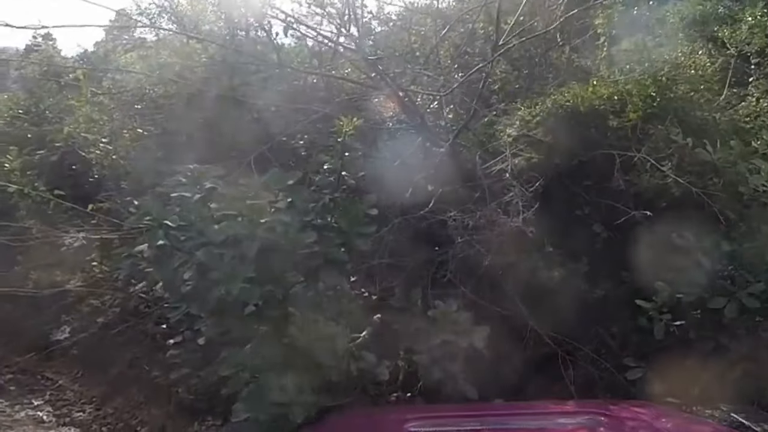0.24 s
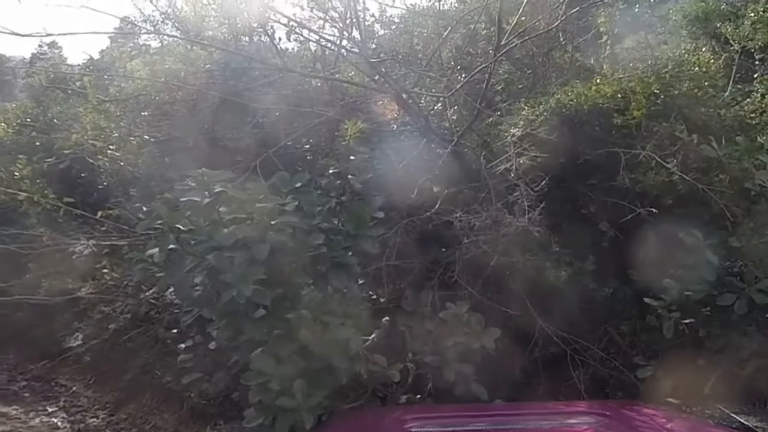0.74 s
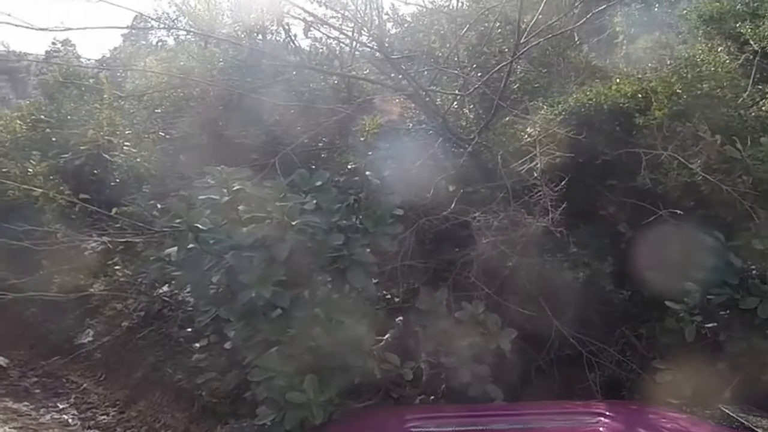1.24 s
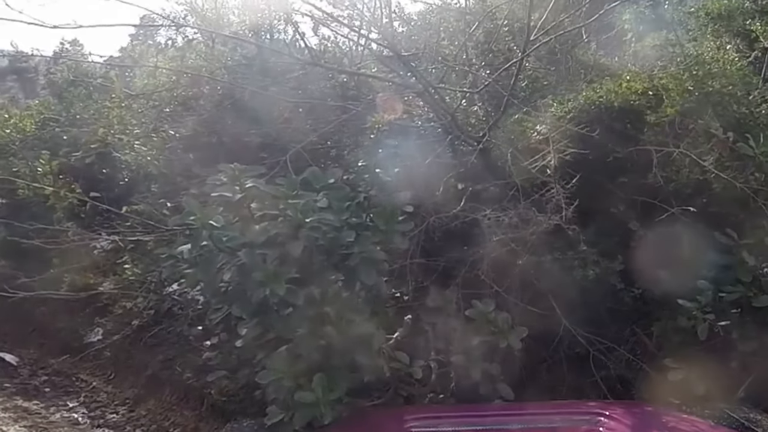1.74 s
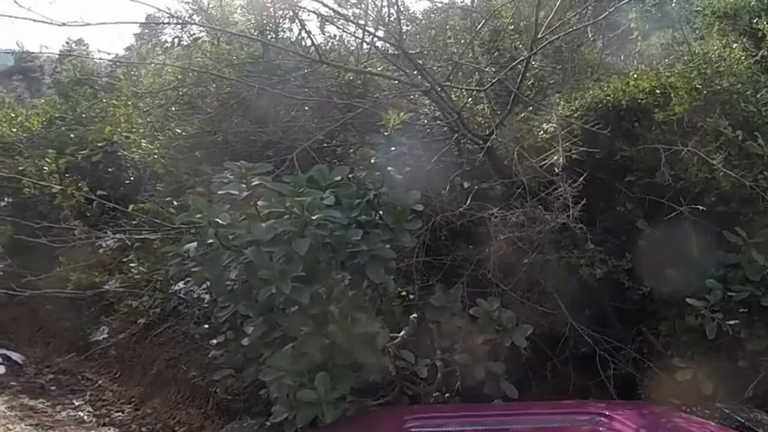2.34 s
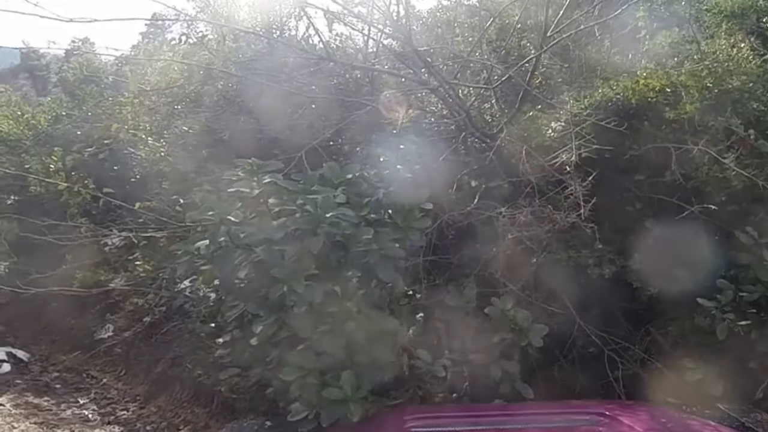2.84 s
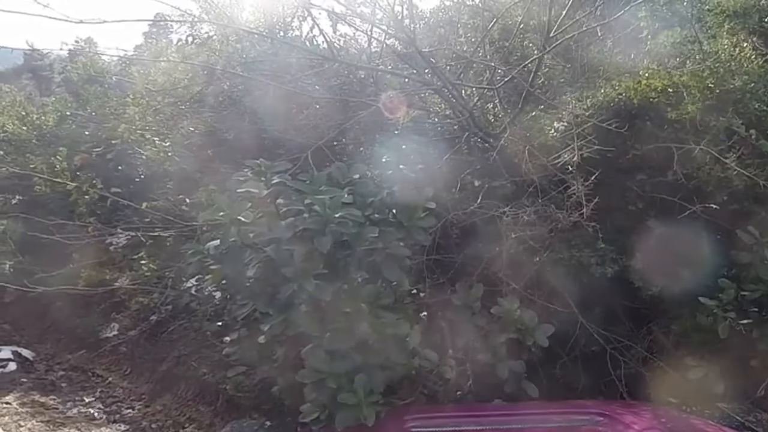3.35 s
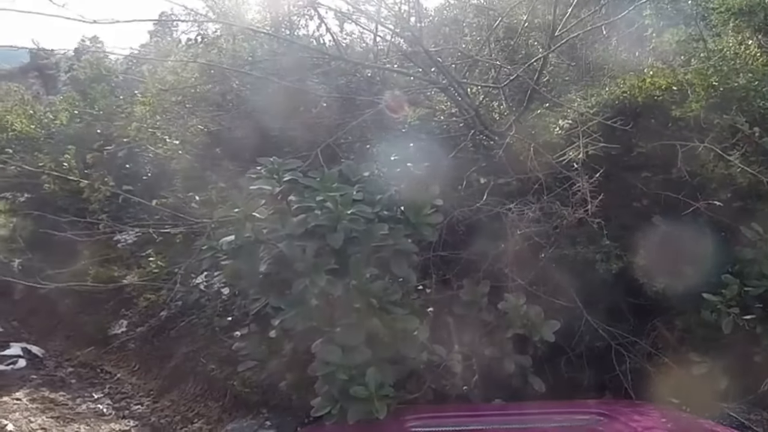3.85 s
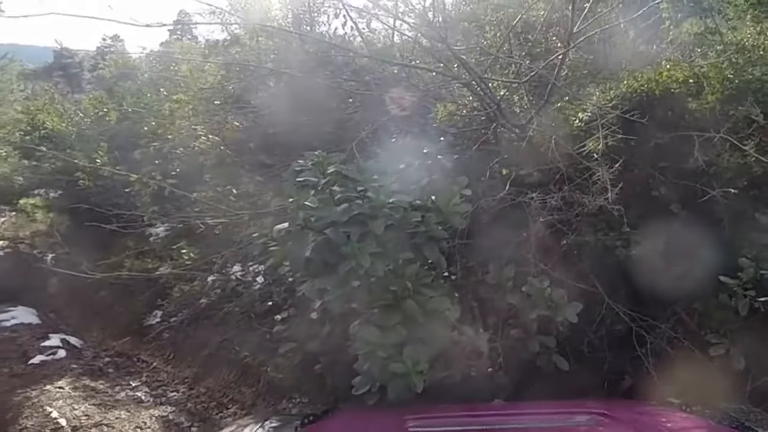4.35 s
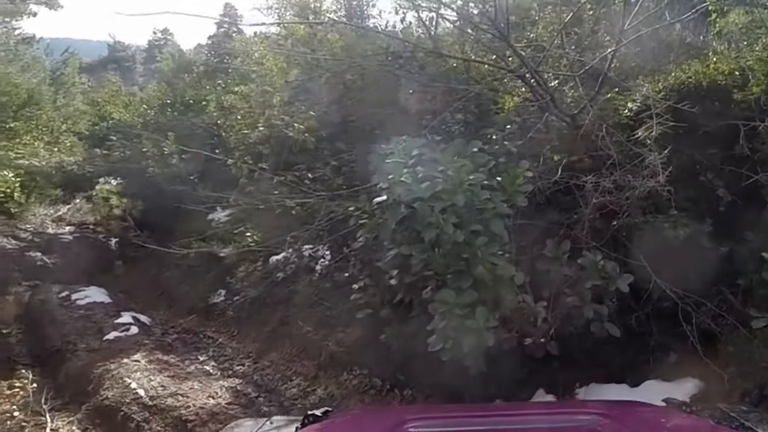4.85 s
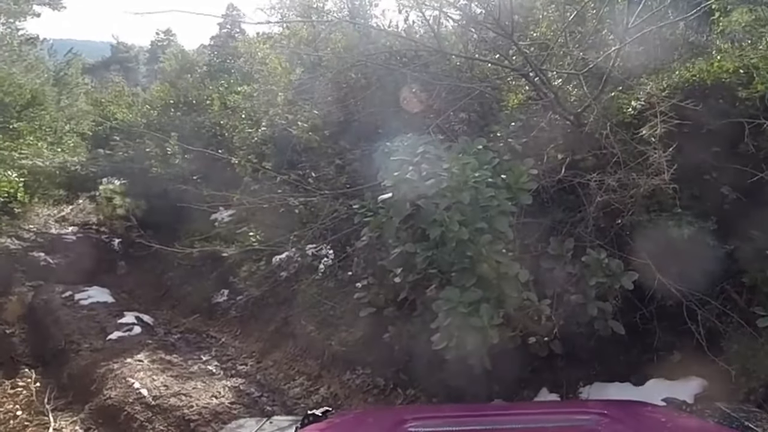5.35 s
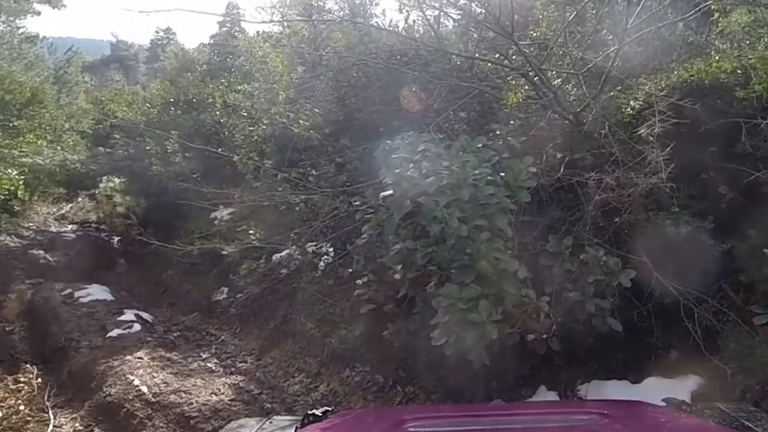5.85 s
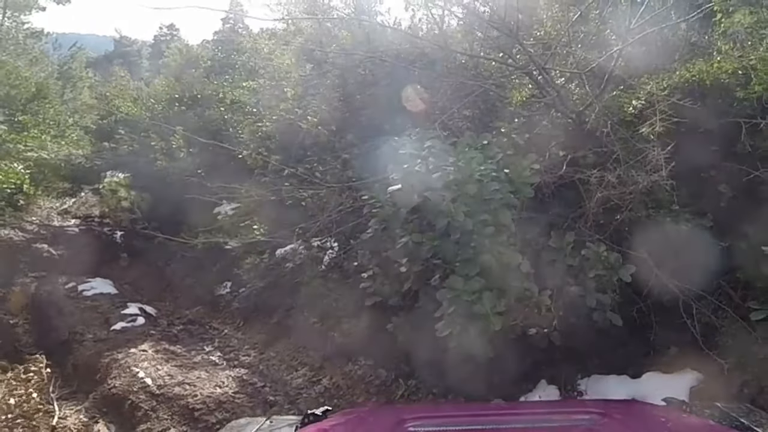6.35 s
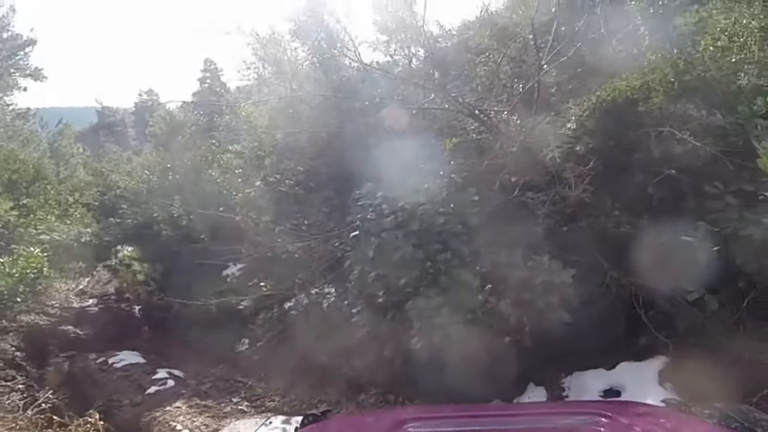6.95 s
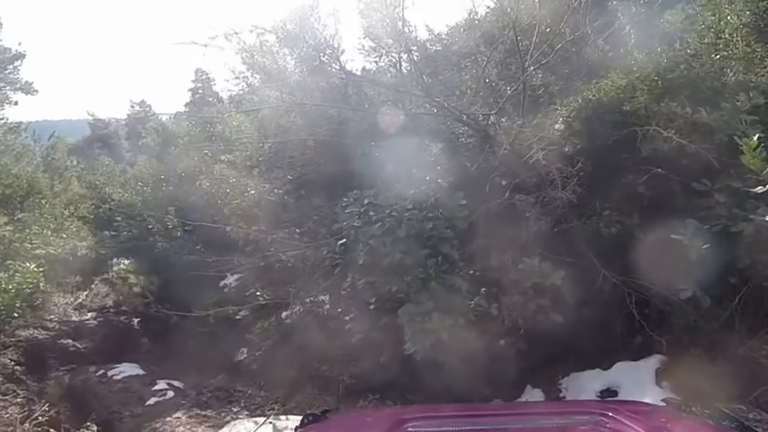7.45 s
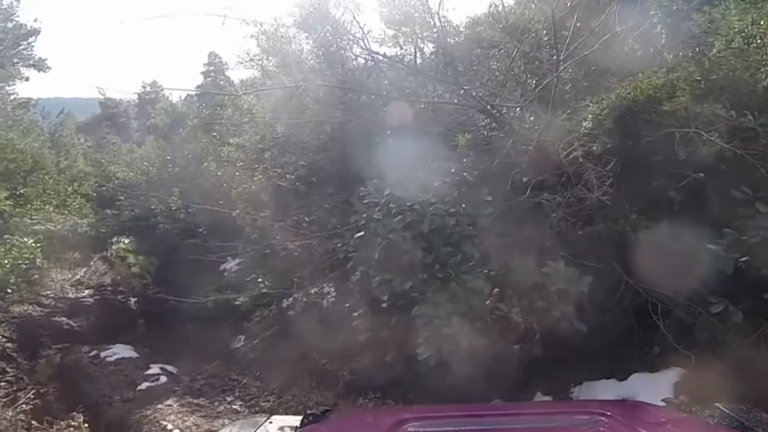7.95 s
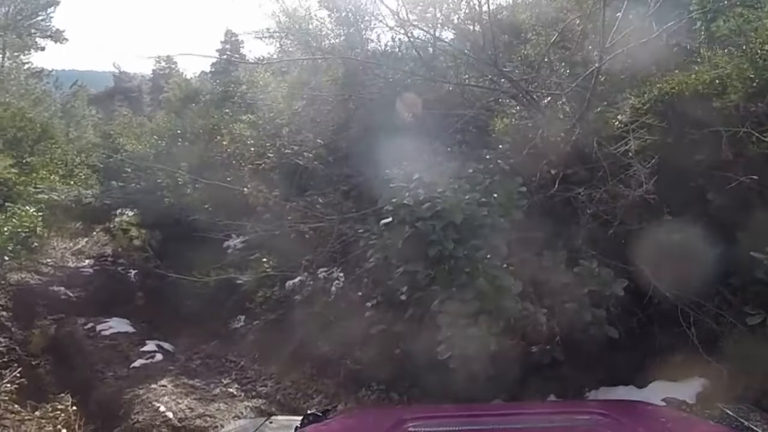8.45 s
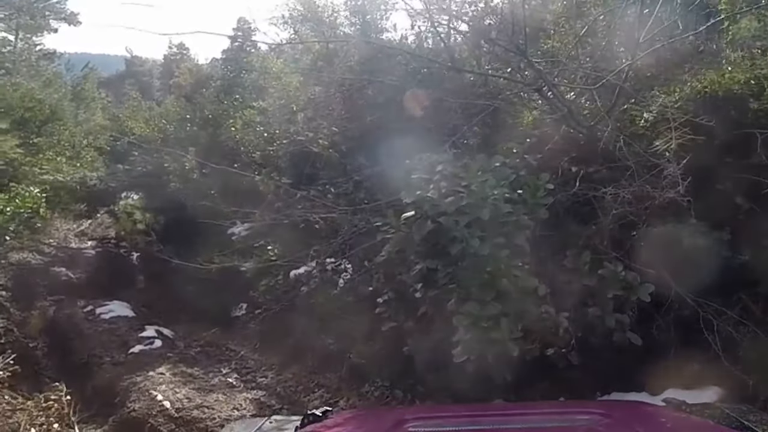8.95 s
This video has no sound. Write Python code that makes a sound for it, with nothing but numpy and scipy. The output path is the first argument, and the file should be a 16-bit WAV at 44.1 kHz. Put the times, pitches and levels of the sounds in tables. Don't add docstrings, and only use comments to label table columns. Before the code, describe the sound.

A boomy, muffled recording position on a four-wheel-drive's body, in a sealed case that dulls the highs. At 0-0.4 s it lurches: a heavy low thump, panel knocks, clip ticks and dry twig snaps. From 0.5 to 2.7 s it is calmer, with a low engine hum, a steering-pump groan around 0.5-1 s and fainter ones near 1.7 and 2.5 s, a deep thump at 1 s and small rattles near 2.1 s. At 2.8 s the engine begins a long rising surge; hard drops hit at 3.2 and 3.4 s, with leaf swishes and a thin gear rasp. It peaks around 4.3 s and eases by 4.9 s. Bumps continue, then a stronger surge starts at 5.9 s, with growling trim and a brief tyre howl near 6.6 s, and sharp knocks at 6.9-7.1 s. From 7.5 s it slows, with softer thumps and a cluster of ticks around 8.4 s, fading to low rumble by 9.2 s.

```python
import sys
import numpy as np
from scipy import signal
from scipy.io import wavfile
from scipy.ndimage import uniform_filter1d

SR = 44100
rng = np.random.default_rng(int(sys.argv[2]) if len(sys.argv) > 2 else 0)


def field_ratio(decibels):
    return 10 ** (np.asarray(decibels, dtype=float) / 20)


def put_to_file(sound):
    columns = np.atleast_2d(sound).T
    safe = np.clip(columns, -1, 1)
    whole_steps = np.round(safe * 32767)
    wavfile.write(sys.argv[1], SR, whole_steps.astype(np.int16))


N = 405719


def evened(x):
    return x / np.sqrt(np.mean(x ** 2) + 1e-20)


def laid(events):
    mix = np.zeros(N)
    for start_s, sound in events:
        part = mix[round(start_s * SR):][:len(sound)]
        part += sound[:len(part)]
    return mix


def columns(rows):
    s, *values = np.transpose(rows)
    t = np.arange(s[0], s[-1], 1 / SR)
    return s[0], [np.interp(t, s, v) for v in values]


def wander(length, hz):
    pole = np.exp(-hz / SR * 6)
    return evened(signal.lfilter([1], [1, -2 * pole, pole ** 2], rng.standard_normal(length)))


def ring_gain(rings, hz):
    return 1 + sum(field_ratio(db) / (1 + (2 * (hz - centre) / width) ** 2) for centre, width, db in rings)


def shaking(colour, size, patchy_db, flicker_db, rings=()):
    hop = size // 4
    hz = np.fft.rfftfreq(size, 1 / SR)
    real, imag, patches = rng.standard_normal((N // hop + 5, len(hz), 3)).T
    patches = uniform_filter1d(patches, size=5, axis=0)
    patches = evened(uniform_filter1d(patches, size=7, axis=1))
    jolts = np.minimum(rng.exponential(1, real.shape[1]), 2.5) - 1
    colour_hz, colour_db = np.transpose(colour)
    gain = field_ratio(np.interp(np.log(hz + 1), np.log(colour_hz), colour_db, -90, -90))
    gain *= ring_gain(rings, hz)
    bins = (real + 1j * imag) * gain[:, None] * field_ratio(patchy_db * patches + flicker_db * jolts)
    return evened(signal.istft(bins, nperseg=size, noverlap=size - hop)[1][:N])


def lifts(rows):
    t = np.arange(0, N / SR + .01, .002)
    humps = sum(np.interp(t, [s - abs(rise), s, s + abs(fall)], [0, db, 0]) for s, db, rise, fall in rows)
    return np.interp(np.arange(N) / SR, t, humps)


# (time [s], roughness [dB])
ROUGHNESS = [(0.04, 4), (.22, 3.5), (.4, 3.5), (.68, -6), (1.9, -5.5), (2.08, -4), (2.26, -3.5),
             (3.66, -0.5), (3.99, 4), (4.27, 0), (4.53, 3.5), (4.84, 1.5), (5.3, 6), (5.75, -0.5),
             (6.0, 5.5), (6.8, 5), (7.44, 0.1), (9.2, -6.5)]
# (time [s], load [dB])
WHEEL_LOAD = [(0, -3), (.7, -4), (2.3, -6), (2.69, -6), (2.87, 1.4), (3.2, 4.5), (3.99, 4), (4.299, 6),
              (5.24, 3.5), (5.75, -0.3), (5.93, 3.5), (6.06, 5.5), (6.62, 7.5), (7.1, 4.5), (7.5, 1.5),
              (8.28, -1.5), (9.2, -6)]


def follow(db, rough_share, load_share):
    t = np.arange(N) / SR
    ground = np.interp(t, *np.transpose(ROUGHNESS))
    load = np.interp(t, *np.transpose(WHEEL_LOAD))
    return db + rough_share * ground + load_share * load


def drift(start, length, first_hz, last_hz, db):
    attack_s, start_db = 0.11, -8
    attack_end_hz = first_hz + attack_s / length * (last_hz - first_hz)
    return [(start, first_hz, db + start_db), (start + attack_s, attack_end_hz, db), (start + length, last_hz, db)]


def surge(rows, orders, rough):
    start_s, (hz, db) = columns(rows)
    size = len(hz)
    turns = np.cumsum(hz * (1 + rough * wander(size, 15.0))) / SR
    tones = sum(field_ratio(d + 0.63 * wander(size, 39.0)) * np.sin(2 * np.pi * k * turns) for k, d in orders)
    level = np.sqrt(2) * field_ratio(db + 1.3 * wander(size, 60.0))
    return start_s, level * tones * signal.windows.tukey(size, .12)


def groan(rows, partials, rough):
    start_s, (hz, low_db, high_db) = columns(rows)
    size = len(hz)
    turns = np.cumsum(hz * (1 + rough * wander(size, 27.0))) / SR
    upper = sum(field_ratio(d + 2.6 * wander(size, 17.0)) * np.sin(2 * np.pi * k * turns + k * k) for k, d in partials)
    stack = field_ratio(low_db) * np.sin(2 * np.pi * turns) + field_ratio(high_db) * upper
    return start_s, np.sqrt(2) * stack * signal.windows.tukey(size, .45)


def ring(hz, t60, rise):
    t = np.arange(round(SR * (t60 + 3 * rise))) / SR
    shape = (1 - np.exp(-t / rise)) ** 2 * field_ratio(-60 * t / t60)
    return shape / shape.max() * np.sin(2 * np.pi * hz * t)


# (time [s], firing rate [Hz], level [dB])
THROTTLE_PUSHES = [
    [(2.75, 51.7, -31), (2.8, 56.85, -15.5), (2.99, 70.5, -22.5), (3.22, 83.87, -18.5), (3.9, 86, -25),
     (4.0, 94.75, -12.5), (4.27, 102.7, -10), (4.68, 105.1, -14.5), (4.88, 105.7, -24)],
    [(5.85, 58.45, -23), (6.014, 80.5, -10.5), (6.128, 97.3, -7), (6.202, 106.1, -10.5), (6.55, 95.95, -15),
     (6.804, 87.3, -25), (6.906, 87.7, -19.5), (7.124, 84, -20.5), (7.2, 82.6, -9)],
]
# (start [s], length [s], first [Hz], last [Hz], level [dB])
ENGINE_DRIFTS = [
    (0.401, 0.6, 53.85, 58.5, -23.5),
    (1.251, 0.89, 101, 82.14, -25.5),
    (7.548, .7, 72.4, 54.5, -30),
    (8.551, 0.66, 104, 86, -26.5),
]
# (multiple of firing rate [-], level [dB])
FIRING_ORDERS = [(.5, -22.5), (1, 1), (1.5, -23.5), (2, -28.5), (3, -36.5)]


def engine():
    rates = THROTTLE_PUSHES + [drift(*row) for row in ENGINE_DRIFTS]
    return laid(surge(rows, FIRING_ORDERS, rough=.006) for rows in rates)


# (start [s], length [s], first [Hz], last [Hz], level [dB], lowest [Hz], highest [Hz])
FIRING_GROWLS = [
    (4.22, 0.53, 102.1, 105, -46, 450, 1090),
    (6.36, 0.43, 101.7, 88, -44, 520, 1150),
    (6.5, .3, 96, 88, -54, 1200, 3000),
]


def growl(start, length, first_hz, last_hz, db, low_hz, high_hz):
    size = round(length * SR)
    turns = np.cumsum(np.linspace(first_hz, last_hz, size) * (1 + .03 * wander(size, 30.0))) / SR
    pulses = 0.44 + np.exp(-(turns % 1) / 0.4)
    bursts = pulses * field_ratio(2.5 * wander(size, 60.0)) * rng.standard_normal(size)
    band = signal.butter(3, [low_hz, high_hz], "band", fs=SR, output="sos")
    return start, field_ratio(db) * evened(signal.sosfilt(band, bursts)) * signal.windows.tukey(size, .7)


def growls():
    return laid(growl(*row) for row in FIRING_GROWLS)


# (start [s], length [s], first [Hz], last [Hz], level [dB])
SHAFT_HUMS = [(3.701, .32, 125, 130, -30.5), (3.999, .5, 69.8, 69.7, -26.5),
              (4.3, 0.444, 152.2, 154, -31.5), (4.4, 0.27, 180, 191, -38), (5.501, .3, 70, 71.7, -32),
              (5.75, .38, 122, 138, -23.5), (5.85, .5, 197, 203, -33.5), (6.35, 0.503, 131, 126, -26),
              (7.049, 0.49, 74, 66, -27), (7.503, 0.19, 360, 335, -41.5), (8.05, 0.24, 290, 297, -43),
              (0.82, 0.29, 263, 285, -48), (6.3, 0.16, 370, 390, -44), (7, 0.195, 580, 628, -49.5),
              (6.54, 0.275, 915, 918, -42.5), (6.6, .22, 600, 615, -48.5), (6.6, 0.13, 1400, 980, -53),
              (4.1, 0.18, 275, 340, -42.5), (3.9, .25, 288, 284, -39.5), (5.4, 0.347, 325, 330, -40.5),
              (6.42, .25, 305, 312, -37), (2.3, 0.089, 580, 670, -50), (2.17, 0.068, 410, 620, -48),
              (6.9, 0.074, 510, 505, -46), (.75, 0.2, 86, 92, -32), (3.8, 0.11, 90, 96, -24),
              (2.3, .12, 58.3, 61, -23), (7.5, .45, 97, 100, -28), (8.06, .33, 102, 106, -29.5),
              (1.2, 0.3, 57, 54, -29), (.2, .2, 100, 104, -27.5), (4.1, 0.27, 288, 292, -41),
              (8.2, .16, 69, 63, -32), (8.7, .25, 262, 245, -48.5), (8.75, .3, 335, 345, -48),
              (7.2, 0.255, 88, 92, -26.5)]


def shafts():
    return laid(surge(drift(*row), [(1, 0)], rough=.008) for row in SHAFT_HUMS)


# (peak time [s], lift [dB], rise [s], fall [s])
BODY_HEAVES = [
    (0.0, 20.5, 0.11, 0.29),
    (.67, -6, .12, 0.18),
    (2.79, 10, 0.59, 1.6),
    (3.46, 6.5, 0.14, 0.051),
    (3.64, 1, 0.098, 0.16),
    (4.59, 18, 0.38, 0.94),
    (5.56, 10.5, 0.099, 0.24),
    (7.0, 17.5, 0.78, 0.24),
    (8.89, 4, .5, .1),
]


def boom():
    mode_hz = 33.63
    db = follow(-31.5, rough_share=0.21, load_share=0.099) + lifts(BODY_HEAVES)
    turns = np.cumsum(mode_hz * (1 + 0.055 * wander(N, 5.6))) / SR
    return np.sqrt(2) * field_ratio(db + 1.3 * wander(N, 20.0)) * -np.cos(2 * np.pi * turns)


# (frequency [Hz], density [dB per Hz])
PAN_COLOUR = [(18, -22), (28, -16), (46, -11), (60, -2), (100, 1.5), (116, -6.5), (135, -17.5), (160, -29),
              (220, -51)]
# (frequency [Hz], width [Hz], level [dB])
FLOOR_MODES = [(56.5, 7.3, 13.5), (72.2, 3.6, 8), (86, 2.4, 9.5), (104, 8.5, 9.5), (123, 20, 6)]
# (peak time [s], lift [dB], rise [s], fall [s])
WHEEL_RUTS = [(1.7, -6.5, 0.48, 0.034), (2.26, -5, 0.23, 0.051), (2.87, 7.5, 0.28, 0.32),
              (3.28, -7, .07, 0.088), (4.5, -4.5, .45, .3), (6.3, -3, .25, 0.32), (7.35, -3, .15, .3),
              (1.4, -3, .2, .2), (5.24, 3, 0.7, 0.04), (5.75, -8, 0.098, 0.12), (5.93, 3, 0.051, 0.11),
              (8.37, -10, 0.18, 0.078), (9.07, -9, 0.57, 0.12)]


def floor_pan():
    noise = shaking(PAN_COLOUR, size=8192, patchy_db=-0.05, flicker_db=0.9, rings=FLOOR_MODES)
    return noise * field_ratio(5.0 + follow(-28, rough_share=0.4, load_share=0.23) + lifts(WHEEL_RUTS))


# (frequency [Hz], density [dB per Hz])
DOOR_COLOUR = [(76, -29.5), (130, 0), (135, -2.5), (167, -6.5), (236, -10), (258, -12), (291, -6),
               (306, -5.5), (393, -18), (450, -30.5), (580, -55.5), (990, -120)]
# (frequency [Hz], width [Hz], level [dB])
DOOR_RINGS = [(156.3, 11, 2.5), (200, 10, 2.5), (282.55, 4.1, 7), (307.9, 7.4, 5.5), (345, 12, 4.5)]
# (peak time [s], lift [dB], rise [s], fall [s])
DOOR_SWAYS = [(.22, -3, .1, 0.16), (.85, -2, .3, .2), (1.6, -2, 0.32, 0.36), (2.6, -3, 0.12, 0.16),
              (3.97, -4.5, 0.11, .15), (5.65, -3, 0.13, .15), (5.25, -4.5, .15, 0.16),
              (5.95, 4, 0.19, 0.23), (7.42, -4, 0.23, 0.19), (8.62, -6, 0.12, 0.11), (1.3, -3, .1, .1),
              (2.2, -4, .06, .06), (8.8, 2, 0.089, 0.11), (9.05, -6, 0.15, .15)]


def doors(shudder):
    noise = shaking(DOOR_COLOUR, size=4096, patchy_db=3.8, flicker_db=1.6, rings=DOOR_RINGS)
    return noise * field_ratio(0.73 * shudder + follow(-36, rough_share=0.96, load_share=0) + lifts(DOOR_SWAYS))


# (frequency [Hz], density [dB per Hz])
TRIM_COLOUR = [(250, -30), (430, -1), (542, -4), (602, -1), (701, -2.5), (833, -9.5), (898, -1.5),
               (981, -3), (1030, -4), (1130, -12.5), (1230, -8.5), (1270, -17.5), (1400, -24),
               (1820, -49.5), (3080, -120)]
# (frequency [Hz], width [Hz], level [dB])
TRIM_RINGS = [(505, 18, 1.5), (615, 21, 2.5), (729, 29, 1.5), (917, 22, 2), (1001.4, 16, 3.5),
              (1200, 15, -0.5)]
# (peak time [s], lift [dB], rise [s], fall [s])
FRAME_TWISTS = [
    (0.04, 1.5, 0.14, .15),
    (.4, 1, .15, 0.099),
    (4.53, 7, 0.68, 0.63),
    (6.74, 10, 0.59, 0.093),
    (7.0, 3, 0.14, 0.54),
    (8.36, 2, 0.071, 0.54),
    (9.2, 2.5, 0.22, .1),
]


def trim(shudder):
    noise = shaking(TRIM_COLOUR, size=2048, patchy_db=2.0, flicker_db=1.05, rings=TRIM_RINGS)
    return noise * field_ratio(1.4 * shudder + follow(-49.5, rough_share=0.63, load_share=0.075) + lifts(FRAME_TWISTS))


# (frequency [Hz], density [dB per Hz])
HISS_COLOUR = [(790, -35.5), (1350, -7), (1640, -6.5), (1830, -7), (2250, -4), (3250, -13), (3870, -12.5),
               (4500, -15.5), (6060, -15), (7280, -20.5), (10100, -25), (13200, -32), (15500, -50)]
# (frequency [Hz], width [Hz], level [dB])
CASE_RINGS = [(1623, 270, 0.5), (2784, 260, 1.5), (3864, 100, 1), (4050, 22, 1.5), (5280, 300, -0.5),
              (5960, 270, 0.5), (6780, 230, 1), (7840, 150, 3), (10030, 260, 1.5)]


def hiss(shudder):
    noise = shaking(HISS_COLOUR, size=1024, patchy_db=1.35, flicker_db=0.0, rings=CASE_RINGS)
    return noise * field_ratio(2.5 + 0.44 * shudder + follow(-59.5, rough_share=0, load_share=0.85))


def body():
    shudder = wander(N, 150.0)
    return floor_pan() + doors(shudder) + trim(shudder) + hiss(shudder)


# (time [s], peak [dB], pitch [Hz])
BODY_THUMPS = [
    (0.009, -10.5, 100.4),
    (0.072, -4.5, 91.4),
    (1.015, -5, 68.4),
    (1.11, -10, 66.6),
    (2.03, -10, 76),
    (3.167, -4.5, 81.9),
    (3.421, -4, 90.6),
    (7.625, -13.5, 84.4),
    (8.021, -9.5, 104),
    (8.449, -7.5, 64.5),
]


def thumps():
    return laid((s, field_ratio(db - 2.0) * ring(hz, t60=0.24, rise=0.0069)) for s, db, hz in BODY_THUMPS)


# (time [s], peak [dB],
# pitch [Hz], t60 [s])
PANEL_KNOCKS = [(0.097, -34, 295, 0.048), (0.0099, -22, 150, 0.12), (.12, -24, 144, .15),
                (1.681, -32.5, 200, 0.12), (2.102, -28.5, 337, 0.094), (2.28, -33, 347, 0.24),
                (2.451, -28, 327, 0.093), (3.172, -25, 330, 0.095), (4.93, -21.5, 310, 0.058),
                (6.731, -22, 308, 0.11), (6.918, -15.5, 300, 0.1), (7.061, -22.5, 308, 0.098),
                (8.021, -22.5, 304.2, 0.066), (0.361, -30, 170, 0.59), (3.45, -26, 172, 0.34),
                (4.5, -25, 300, 0.39), (4.61, -25, 308, 0.49), (5.971, -17, 147, 0.28),
                (6.801, -24.5, 297, 0.1), (7.09, -24.5, 345, 0.092), (7.27, -31, 333, .08),
                (7.32, -32, 204, 0.22), (7.12, -24.5, 178, 0.12), (7.72, -30.5, 178, 0.21),
                (8.44, -33, 207, .1), (2.3, -32, 176, .2), (5.42, -30, 327, 0.24),
                (5.099, -25.5, 133.7, 0.48), (8.02, -27.5, 209, 0.14), (3.82, -37.5, 490, 0.19),
                (7.71, -41.5, 500, 0.19), (2.11, -40, 470, .12), (7.46, -32.5, 187, 0.18),
                (5.47, -24, 135, 0.16), (5.86, -28.5, 195, .15), (6.47, -29, 303, .1),
                (7.57, -19, 95.3, 0.31)]


def knocks():
    return laid((s, field_ratio(db) * ring(hz, t60, rise=0.046 * t60)) for s, db, hz, t60 in PANEL_KNOCKS)


# (start [s], length [s], mid-climb time [s], level [dB], strain [dB])
STEERING_GROANS = [
    (.5, 0.47, 0.61, -28, 15.5),
    (1.66, 0.25, 1, -32, 13),
    (2.44, 0.523, 2.67, -29, 3),
]
# (multiple [-], level [dB])
PUMP_PARTIALS = [(2, 8.5), (3, 5.5), (4, 2), (5, -9), (6, -14.5), (8, -18), (11, -20.5)]


def pump(start, length, middle, db, strain_db):
    idle_hz, full_hz, climb_s = 160.3, 194.7, 0.0612
    s = np.linspace(start, start + length, num=20)
    climb = 1 / (1 + np.exp((middle - s) / climb_s))
    hz = idle_hz + (full_hz - idle_hz) * climb
    low_db = db - strain_db * climb ** 2.9
    high_db = db - 33 + 0.53 * strain_db * climb
    return np.transpose([s, hz, low_db, high_db])


def steering():
    return laid(groan(pump(*row), PUMP_PARTIALS, rough=0.0025) for row in STEERING_GROANS)


# (time [s], tread rate [Hz], lowest partial [dB], upper partials [dB])
TYRE_SPINS = [
    [(6.28, 298, -51.5, -53), (6.42, 322, -56, -45.5), (6.52, 345, -56, -43), (6.6, 378, -53, -36)],
    [(6.54, 186.8, -42, -39), (6.62, 198.9, -44, -45.5), (6.7, 204.7, -26, -41), (6.78, 197, -48, -52)],
]
# (multiple [-], level [dB])
TREAD_PARTIALS = [
    [(2, -2), (3, -6), (4, -23)],
    [(3, -6.5), (4, -10), (5, 4.5), (6, -16), (7, -21)],
]


def tyres():
    return laid(groan(rows, partials, rough=.012) for rows, partials in zip(TYRE_SPINS, TREAD_PARTIALS))


# (time [s], peak [dB], pitch [Hz])
CLIP_TICKS = [(0.137, -35, 660), (0.242, -34, 720), (2.077, -37, 900), (2.084, -37, 750), (2.091, -39, 844),
              (2.101, -39, 800), (2.124, -35, 844), (.352, -35, 726), (.095, -41, 800), (.19, -44, 900),
              (2.275, -49, 740), (4.93, -41, 685), (5.41, -44, 897), (7.965, -43, 640), (2.445, -41, 754),
              (3.372, -37.5, 623), (3.731, -34, 705), (3.793, -33, 640), (3.93, -34, 705),
              (3.953, -32, 650), (4.017, -33, 634), (4.525, -30, 583.7), (5.634, -35, 738),
              (6.759, -31, 703), (6.918, -29.5, 656), (6.983, -39, 550), (7.068, -30, 600),
              (7.826, -41, 900), (8.053, -36.5, 680), (8.305, -37, 618), (8.316, -36.5, 694),
              (8.372, -42, 710), (8.393, -34.5, 646), (8.425, -36, 674), (8.444, -34.5, 680),
              (8.482, -32.5, 625), (8.825, -33.5, 663), (9.06, -31.5, 670), (9.15, -33, 685)]
# (ratio to pitch [-], level [dB], t60 [s])
CLIP_MODES = [(0.998, 3.5, 0.017), (1.171, -10.5, 0.031), (1.9, -17.5, .012), (2.549, -19, 0.025),
              (3.3, -16, 0.0062), (5.2, -25.5, 0.0073)]


def rattles():
    return laid((s, field_ratio(db + mode_db) * ring(hz * ratio, t60, rise=.0022))
                for s, db, hz in CLIP_TICKS for ratio, mode_db, t60 in CLIP_MODES)


# (frequency [Hz], density [dB per Hz])
GEAR_COLOUR = [(1950, -20), (2080, -0.5), (2150, 5), (2230, -2.5), (2320, 4), (2420, -13), (2550, -24)]
# (peak time [s], lift [dB], rise [s], fall [s])
GEAR_TAKE_UPS = [
    (.76, 7, 0.13, 0.33),
    (2.33, -5.5, 0.37, .3),
    (2.69, 3, .05, 0.13),
    (2.95, 4.5, 0.31, 0.28),
    (7.6, 3, 0.86, 1.3),
]
# (start [s], length [s], first [Hz], last [Hz], level [dB])
MESH_WHINES = [
    (0.659, 0.34, 2155, 2110, -66),
    (.8, .22, 2200, 2260, -64),
    (3.02, 0.42, 2080, 2184, -63),
    (3.054, 0.43, 2250, 2300, -58.5),
    (4.055, .6, 2124, 2200, -61.5),
]


def gears():
    rasp = shaking(GEAR_COLOUR, size=1024, patchy_db=0.5, flicker_db=1.7)
    rasp *= field_ratio(follow(-61.5, rough_share=-.1, load_share=1.21) + lifts(GEAR_TAKE_UPS))
    return rasp + laid(surge(drift(*row), [(0.98, 0.0087)], rough=0.001) for row in MESH_WHINES)


def crackle(low_hz, high_hz, length):
    grains = rng.standard_normal(12000) * field_ratio(1.5 * np.minimum(rng.exponential(1, 12000), 4))
    band = signal.butter(2, [low_hz, high_hz], "band", fs=SR, output="sos")
    return evened(signal.sosfilt(band, grains[:round(length * SR)]))


def snap(db, low_hz, high_hz, length):
    noise = crackle(low_hz, high_hz, 2 * length)
    t = np.arange(len(noise)) / SR
    return noise * field_ratio(db - 14 * t / length) * (1 - np.exp(-t / 0.00031))


def swish(db, low_hz, high_hz, length):
    noise = crackle(low_hz, high_hz, length)
    return noise * field_ratio(db) * np.hanning(len(noise))


# (time [s], peak [dB], lowest [Hz], highest [Hz], length [s])
TWIG_SNAPS = [(.015, -41, 400, 1060, .025), (0.093, -53.5, 400, 1190, 0.013), (0.143, -43, 600, 890, 0.03),
              (0.248, -43.5, 500, 1200, 0.024), (0.314, -42, 2200, 13500, 0.022),
              (.314, -45, 5900, 7100, .015), (0.317, -49, 500, 1500, .012), (0.353, -48, 2800, 3980, 0.012),
              (0.351, -35, 490, 960, 0.024), (.352, -45, 1540, 2300, 0.016),
              (1.57, -49.5, 1100, 8700, 0.028), (1.571, -49, 5600, 6200, .02),
              (1.569, -53, 1700, 2100, .025), (1.816, -53, 3000, 7000, 0.019),
              (2.075, -43, 560, 1080, 0.06), (2.076, -54, 1300, 2600, 0.092), (2.123, -49, 600, 5200, .045),
              (2.122, -44, 2300, 4170, 0.0065), (2.267, -58, 2000, 4000, 0.0088),
              (3.373, -44.5, 510, 980, 0.061), (2.934, -44.5, 3500, 12900, 0.015),
              (5.626, -50, 1587, 2030, 0.018), (6.766, -47, 4480, 13500, 0.019),
              (2.933, -38, 11500, 15000, .003), (.315, -48, 10500, 14500, .004),
              (6.908, -40.5, 402, 1200, 0.054), (7.066, -39.5, 475, 1100, 0.041),
              (8.017, -37, 210, 600, 0.032)]
# (time [s], peak [dB], lowest [Hz], highest [Hz], length [s])
LEAF_BRUSHES = [
    (0.215, -59, 4470, 7460, .08),
    (3.384, -51, 2200, 11000, 0.13),
    (3.37, -51.5, 2000, 2280, 0.16),
    (3.46, -53.5, 2100, 3000, 0.049),
    (0.1, -61, 3000, 4500, .035),
    (3.588, -50.5, 2200, 10440, 0.14),
    (3.56, -51.5, 2080, 2280, 0.19),
    (4.07, -55.5, 2050, 2350, .12),
    (5.86, -55, 4600, 10600, .28),
]


def undergrowth():
    dry_twigs = laid((s, snap(*row)) for s, *row in TWIG_SNAPS)
    dry_leaves = laid((s, swish(*row)) for s, *row in LEAF_BRUSHES)
    hz = np.fft.rfftfreq(512, 1 / SR)
    colour = ring_gain(CASE_RINGS + [(2300, 330, 2.9)], hz) / np.sqrt(1 + (hz / 3500) ** 2)
    taps = signal.minimum_phase(signal.firwin2(511, hz, colour ** 2, fs=SR))
    return signal.oaconvolve(dry_twigs + dry_leaves, taps)[:N]


def scene():
    mix = engine() + growls() + shafts() + boom() + body() + thumps() + knocks()
    mix += steering() + tyres() + rattles() + gears() + undergrowth()
    return mix[None]


# (frequency [Hz], density [dB per Hz])
MIC_NOISE = [(1760, -31.5), (3000, -1), (3540, -8.5), (5450, -8.5), (10100, -12), (13300, -13.5),
             (15600, -19)]


def self_noise():
    rings = [(8450, 130, 4), (10000, 500, -1.5)]  # (Hz, width Hz, dB)
    return field_ratio(-69.5) * shaking(MIC_NOISE, size=512, patchy_db=2.5, flicker_db=2.0, rings=rings)


def low_pass(x):
    return signal.sosfilt(signal.butter(12, 15690, fs=SR, output="sos"), x)


def record(dry):
    noisy = dry + self_noise()
    limited = 1.106 * np.tanh(noisy / 1.12)
    return low_pass(limited)


dry = scene()
out = record(dry)
put_to_file(out)
```